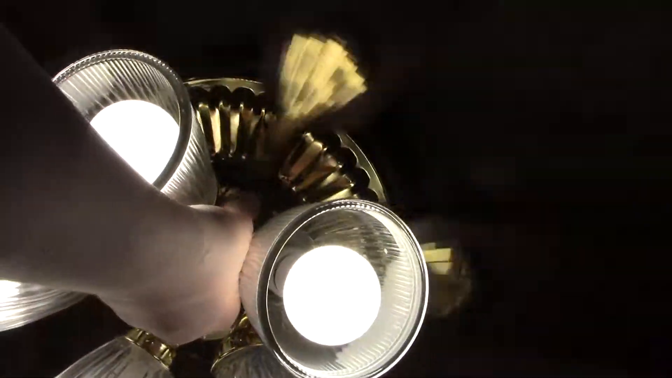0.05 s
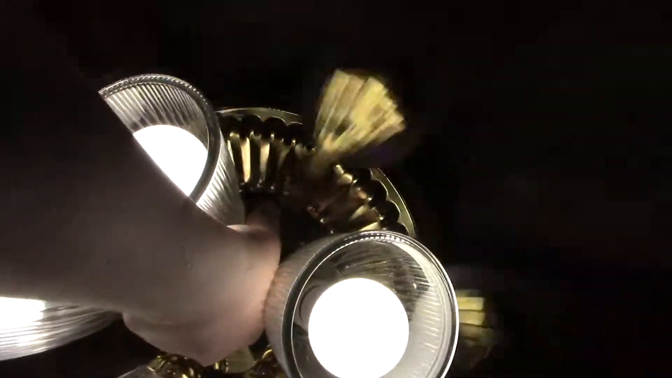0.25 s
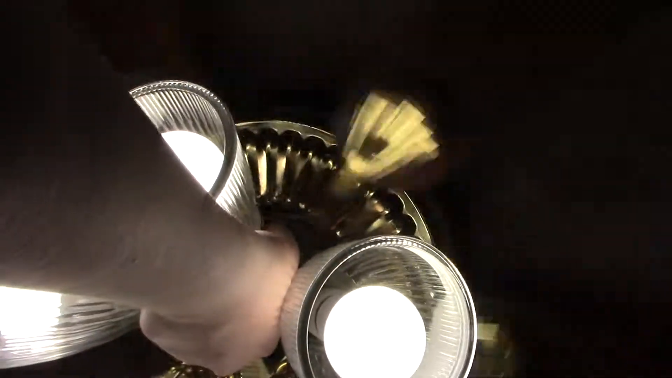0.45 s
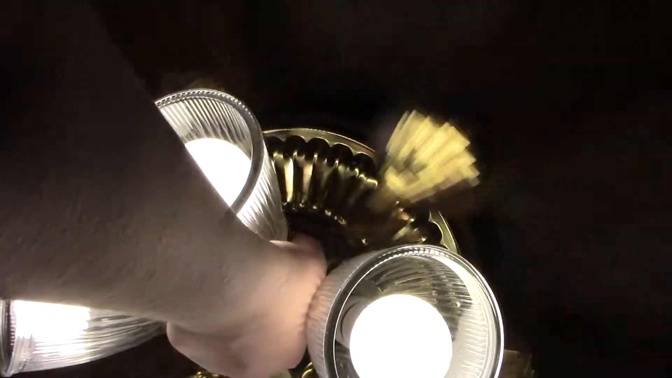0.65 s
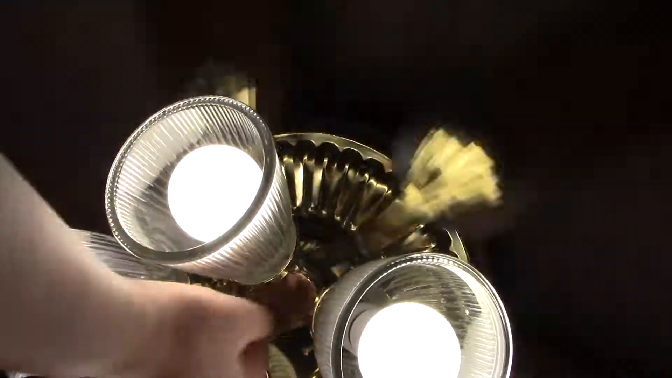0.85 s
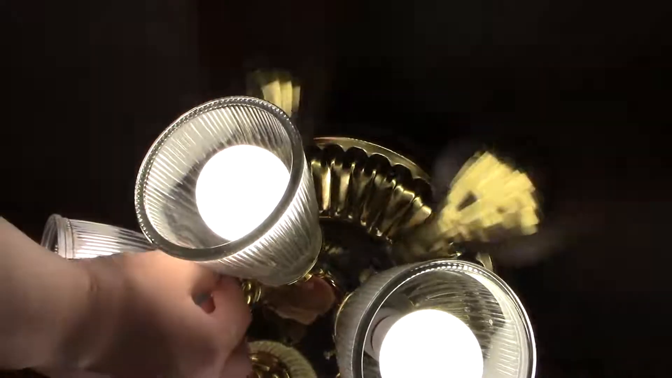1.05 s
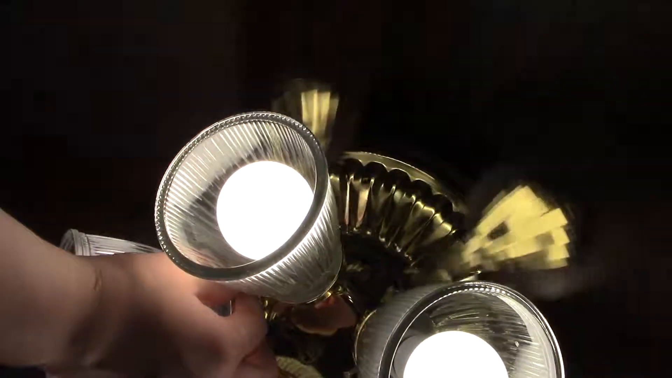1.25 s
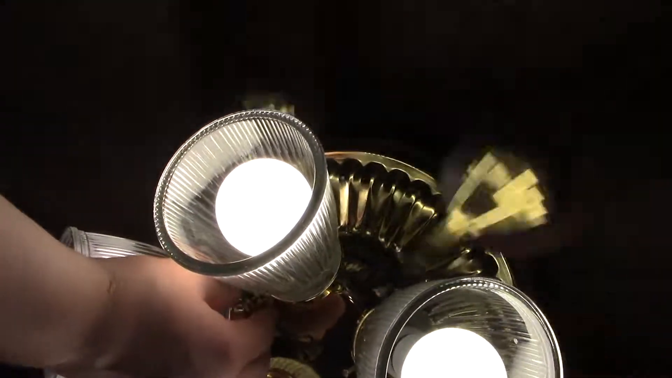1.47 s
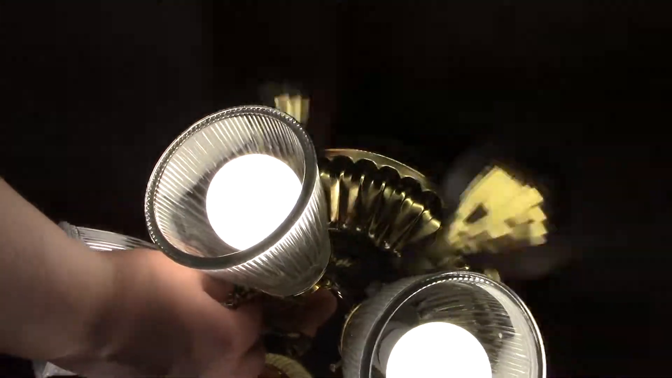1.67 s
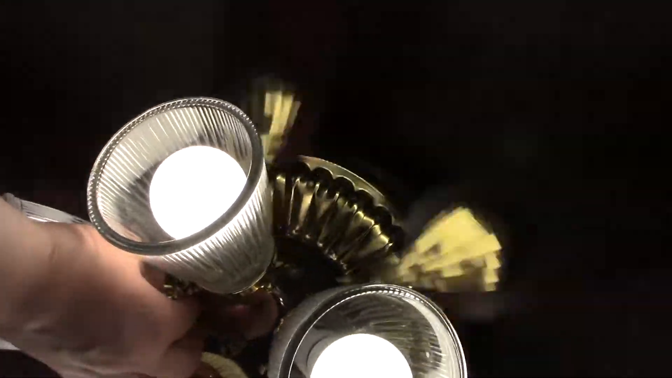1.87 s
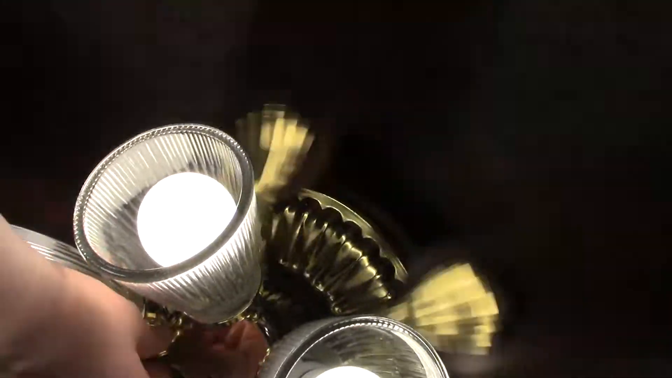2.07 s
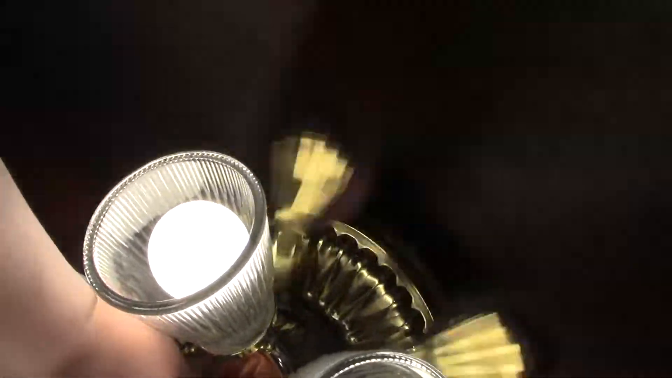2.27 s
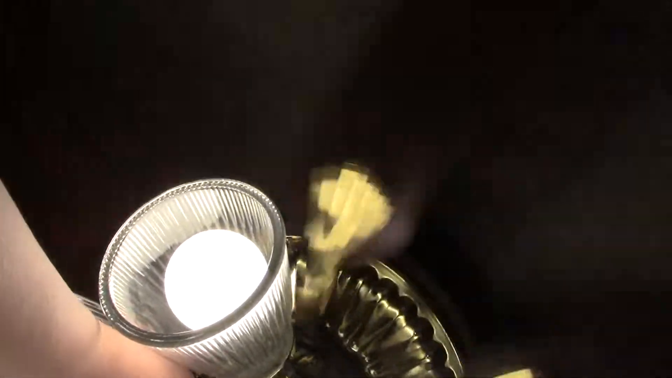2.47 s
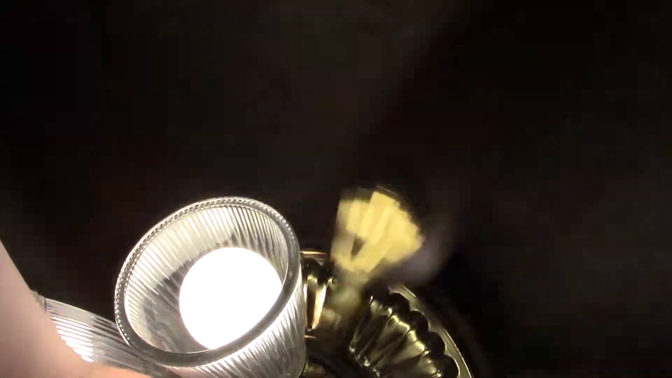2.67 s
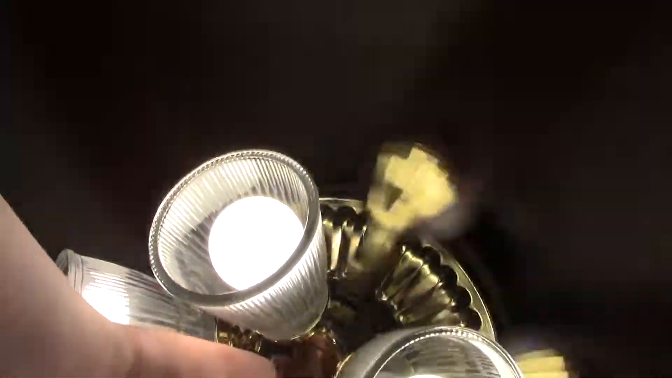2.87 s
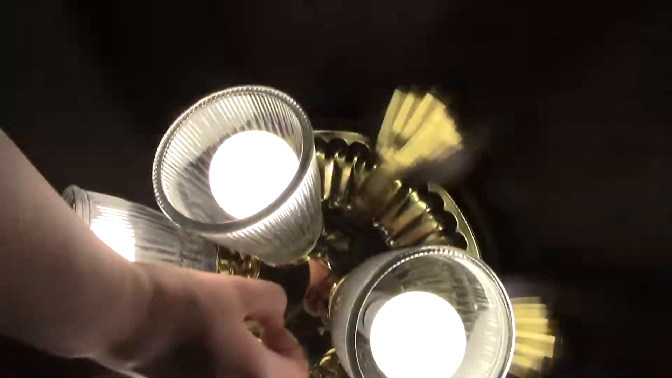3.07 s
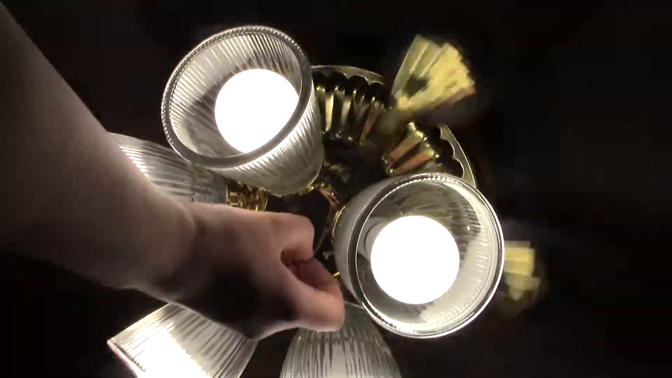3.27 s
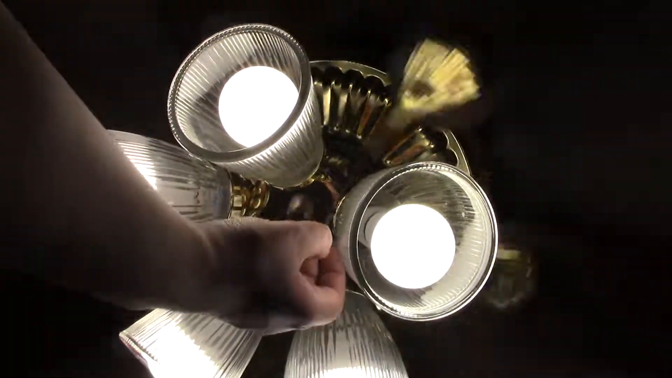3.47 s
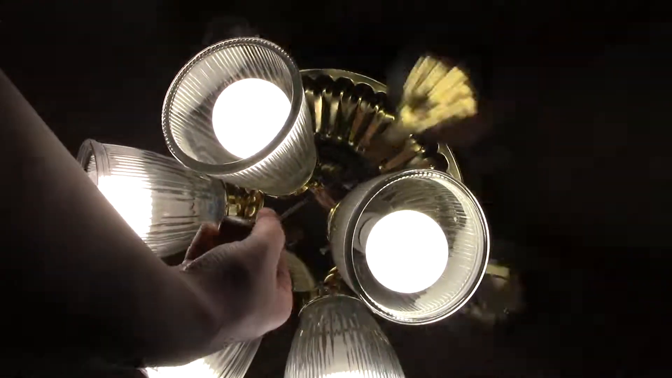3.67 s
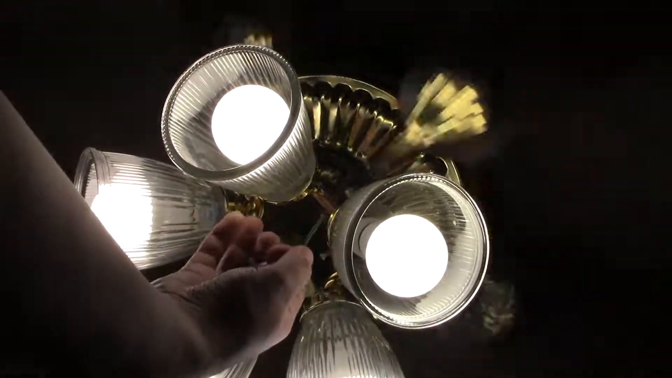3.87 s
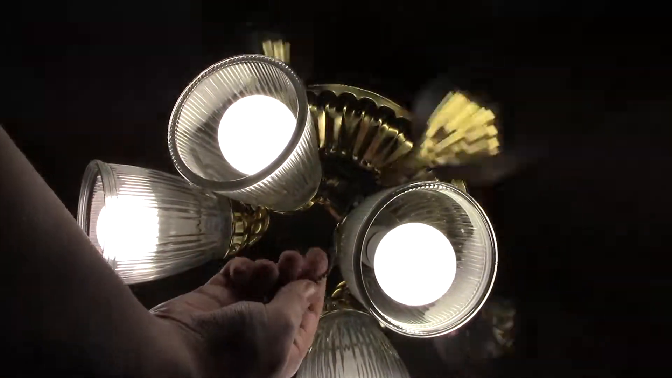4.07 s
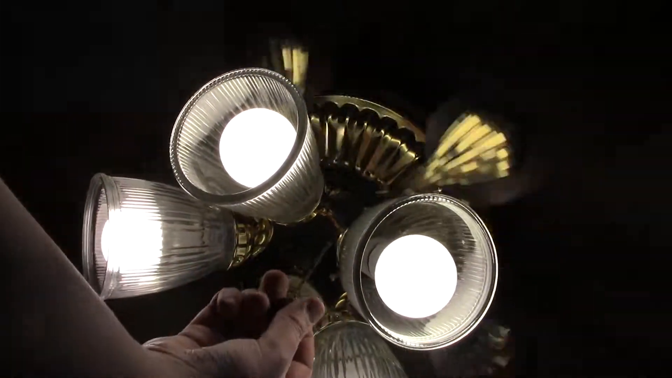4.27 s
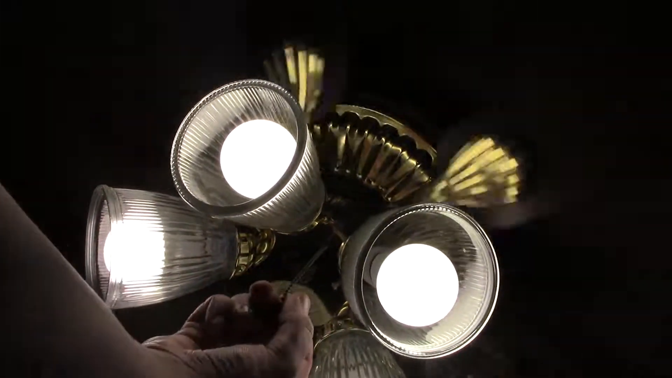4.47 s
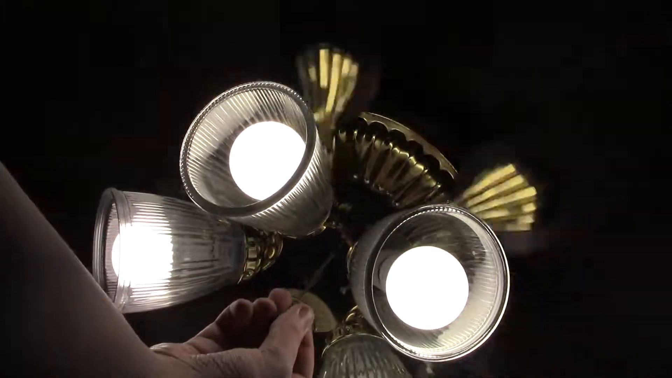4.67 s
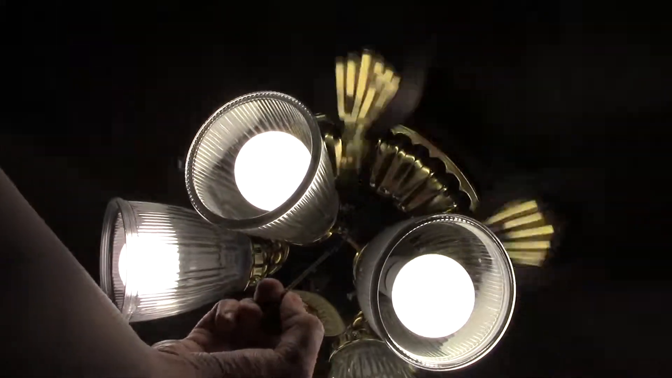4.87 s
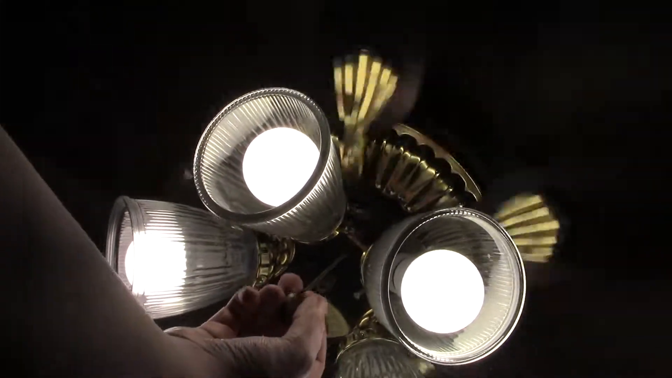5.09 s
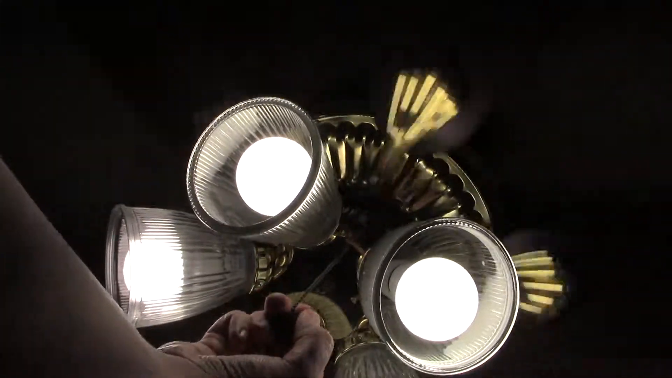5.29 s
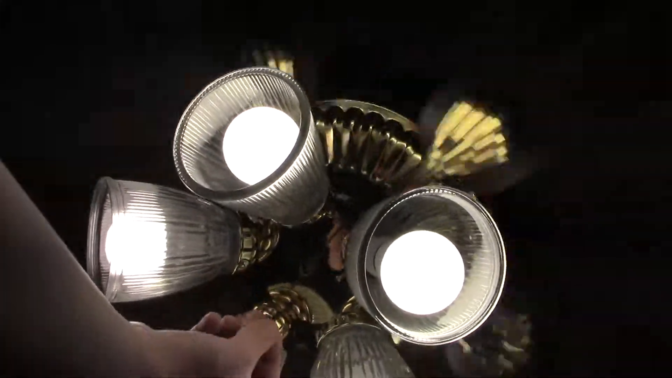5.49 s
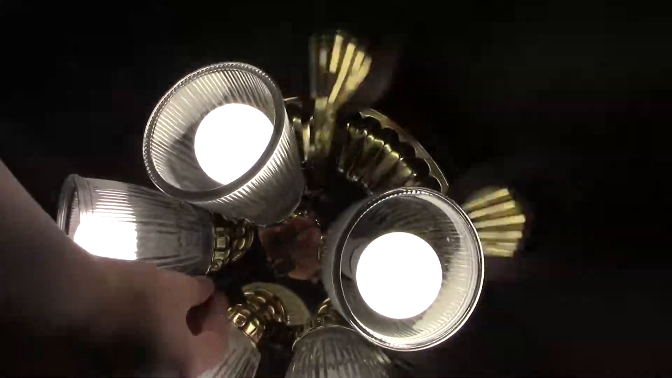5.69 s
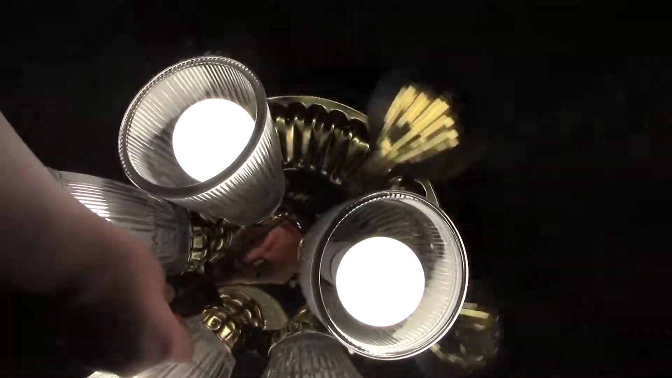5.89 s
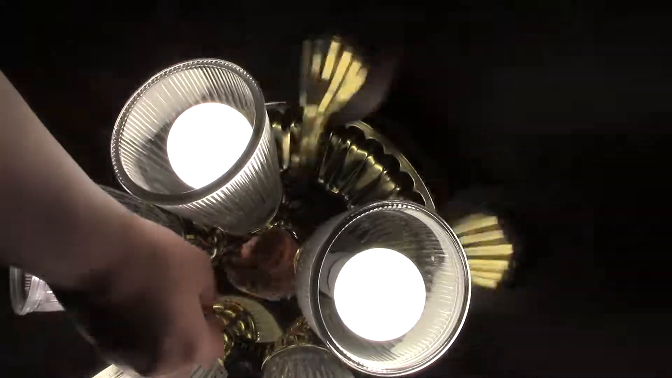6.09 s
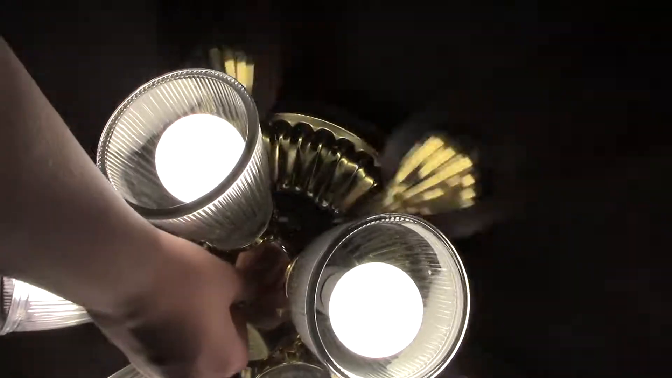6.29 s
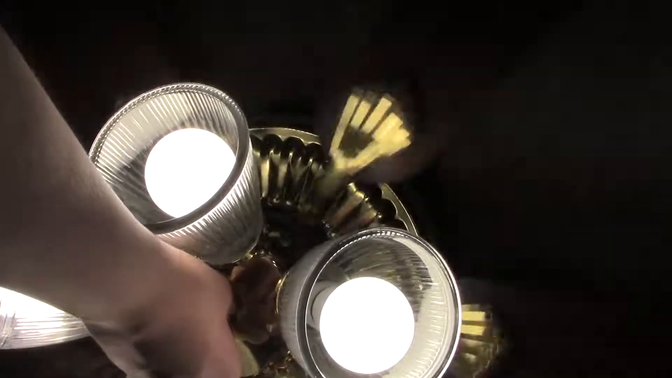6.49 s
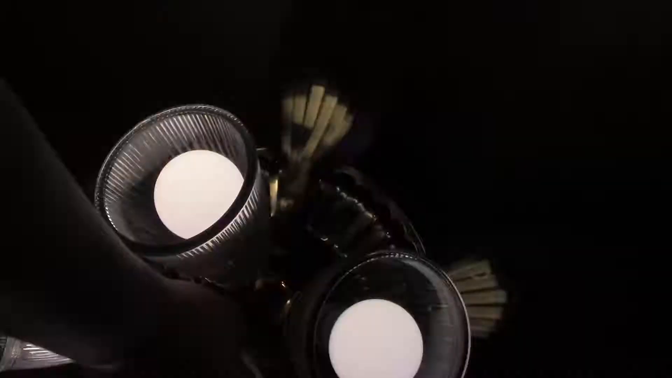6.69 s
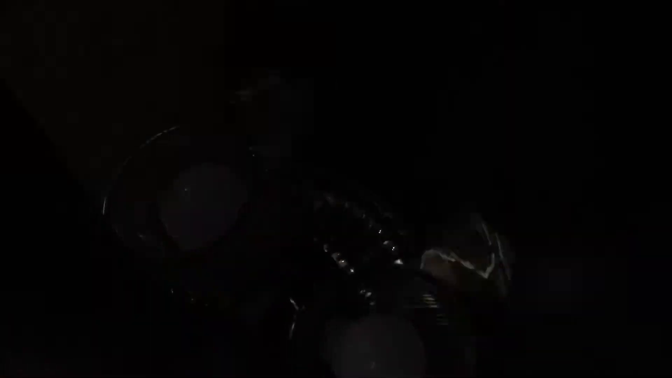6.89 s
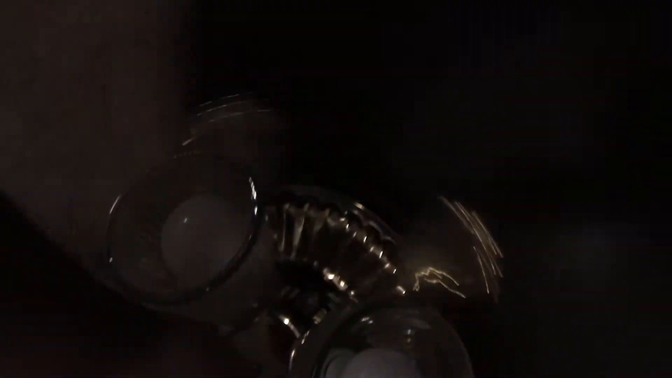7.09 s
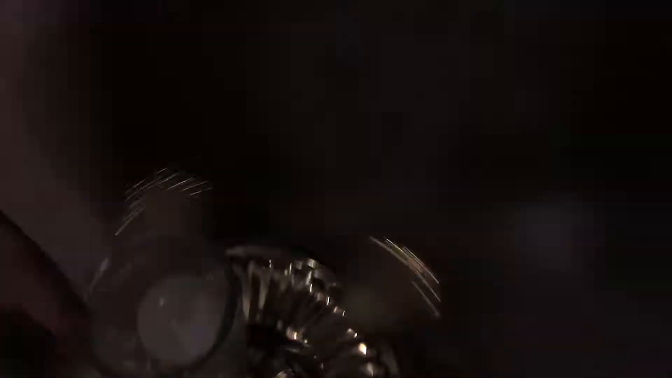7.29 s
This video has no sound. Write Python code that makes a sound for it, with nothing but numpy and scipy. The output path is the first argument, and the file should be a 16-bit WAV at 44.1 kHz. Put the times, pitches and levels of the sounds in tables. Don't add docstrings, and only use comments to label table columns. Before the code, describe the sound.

A ceiling fan turns throughout with a low, airy whir and faint motor hum, slightly stronger from about 2 to 5.5 seconds, then softening. The handling is very close, in a small room with short faint echo. From 0 to 2.4 s there are only quiet chain drags, finger taps, a soft creak near 0.8 s and glass or housing ticks around 1.5 s. Loud, hard knocks on thin brass burst out at 2.65 and 2.71, then 2.86 and 3.07, ringing briefly. Light glass ticks follow, with a bright one at 4.25. From 4.3 to 5.4 six quick chain pulls ratchet and snap with tiny spring pings. At 5.95 to 6.15 beads jingle and rub noisily on glass and brass. After light taps, the lamp switch snaps sharply at 6.74, clunks hollowly on release at 6.92, and the chain rustles away until about 7.4.

```python
import sys
import numpy as np
from scipy import signal
from scipy.fft import rfft, irfft, next_fast_len
from scipy.io import wavfile
from scipy.ndimage import uniform_filter1d, map_coordinates

SR = 44100
rng = np.random.default_rng(int(sys.argv[2]) if len(sys.argv) > 2 else 0)


def dump(signal):
    limited = np.clip(np.atleast_2d(signal).T, -1, 1)
    pcm = np.round(limited * 32767).astype(np.int16)
    wavfile.write(sys.argv[1], SR, pcm)


def ratio_of_db(decibels):
    return 10 ** (np.asarray(decibels, float) / 20)


N = 323694

# from_hz, to_hz
BANDS = [(500, 2000), (2000, 6500), (6500, 14000)]
# pitch_hz, level_db, t60_s
SHADE_MODES = [(2515, -7.5, 0.036), (4220, -7, 0.065), (4830, -21.5, 0.033), (5400, -3.5, 0.062),
               (6050, -8, 0.065), (7100, -0.5, .03), (8810, -1.5, 0.048), (9200, -11, 0.043),
               (11100, -17.5, 0.027), (11430, -3, .055), (12000, -8.5, .055), (13300, -5.5, .05),
               (14200, -3.5, .045), (15500, -9.5, .04)]
# start_s, mid_peak_db, low_db, high_db (both against mid), pitch_hz
CUP_KNOCKS = [
    (2.57, -24.5, 1.5, -23.5, 1310),
    (2.598, -30, 8, -9.5, 2140),
    (2.6461, -3.5, 1.5, -32, 2305),
    (2.6607, -17, 3.5, -39.5, 2090),
    (2.6729, -14, -0.5, -7.5, 2315),
]
RIM_KNOCKS = [
    (2.861, -6.5, 3.4, 0.5, 1715),
    (2.968, -18.5, 4.5, -15.5, 655),
]
ARM_KNOCKS = [
    (2.5585, -27.5, -9.5, 5.5, 5180),
    (2.713, -4.5, 0, -9.5, 4200),
    (2.785, -16.5, 7, -18, 1280),
]
BELL_KNOCKS = [
    (3.0673, -8.5, 0.72, -12, 2500),
]
# start_s, mid_peak_db, spring_db, rebound_db
PULLS = [
    (4.376, -19, 4.5, -13),
    (4.5831, -18.5, 4, -16),
    (4.813, -19.5, 12, -9),
    (4.9718, -14, 7, -12),
    (5.2121, -17, 6.5, -5.5),
    (5.3983, -15.5, -2, -15),
]
HARD_RISE_S = 0.0006


def unit(x):
    return x / np.sqrt(np.mean(x ** 2) + 1e-20)


def along(points, hz):
    f, v = np.transpose(points)
    return np.interp(np.log(hz + 1), np.log(f + 1), v)


def curves(rows):
    s, *cols = np.transpose(rows)
    return [np.interp(np.arange(N) / SR, s, c) for c in cols]


def wobble(rate):
    knots = rng.standard_normal(int(N * rate / SR) + 4)
    return map_coordinates(knots, [np.arange(N) * rate / SR])


def filtered(x, response):
    m = next_fast_len(N + SR // 2)
    return irfft(rfft(x, m) * response(np.fft.rfftfreq(m, 1 / SR)), m)[..., :N]


def resonances(peaks):
    def response(f):
        total = 0
        for k, (centre, width, db) in enumerate(peaks):
            peak = 1j * f * width / (centre * centre - f * f + 1j * f * width)
            total = total + (-1) ** k * ratio_of_db(db) * peak
        return total
    return response


def spikes(seconds, gains):
    return np.bincount(np.round(seconds * SR).astype(int), gains, N)[:N]


def fading(x, t60):
    return signal.lfilter([1], [1, -ratio_of_db(-60 / (t60 * SR))], x)


def struck(chatter, events, modes, ring_db, crack_t60s, body_db, body_t60s, scatter_db, detune, rise=0.0063):
    s, mid_db, low_db, high_db = np.transpose(events)[:4]
    colour_db = np.array([mid_db + low_db, mid_db, mid_db + high_db])
    out, rattle = np.zeros(N + SR), np.zeros(N)
    for edges, db, crack, body in zip(BANDS, colour_db, crack_t60s, body_t60s):
        band_pass = signal.butter(2, edges, "bandpass", fs=SR, output="sos")
        noise = unit(signal.sosfilt(band_pass, rng.standard_normal(N)))
        blows = spikes(s, ratio_of_db(db - 10.5))
        out[:N] += noise * (fading(blows, crack) - fading(blows, rise))
        rattle += noise * ratio_of_db(body_db) * chatter * fading(blows, body)
    walls = resonances([(hz, 0.1 * hz, 0) for hz, _, _ in modes])
    out[:N] += filtered(rattle, lambda f: 0.65 + 0.65 * abs(walls(f)))

    hz, level_db, t60 = np.transpose(modes)[:, :, None]
    band = np.searchsorted([BANDS[0][1], BANDS[1][1]], hz)
    t = np.arange(int(min(t60.max(), 1) * SR)) / SR
    onset = 1 - np.exp(-t / rise * 3.3)
    chance = rng.standard_normal((len(s), 3, len(modes), 1))
    for start, db, (luck, shift, split) in zip(s, (colour_db + ring_db).T, chance):
        turn = 2 * np.pi * hz * t * (1 + detune * shift)
        pair = (np.sin(turn) + 1.57 * np.sin(turn * (1 + 0.011 * split))) * onset
        decay_db = db[band] + level_db + scatter_db * luck - 60 * t / t60
        out[round(start * SR):][:len(t)] += np.sum(ratio_of_db(decay_db) * pair, 0)
    return out[:N]


def clacks(events, level_db, muffle=1):
    out, t = np.zeros(N + SR), np.arange(SR // 10) / SR
    damping = 60 / 0.9
    onset = 1 - np.exp(-t / 0.00016)
    for s, mid_db, low_db, high_db, hz in events:
        db = mid_db
        if hz < BANDS[0][1]:
            db = mid_db + low_db
        elif hz > BANDS[1][1]:
            db = mid_db + high_db
        decay = ratio_of_db(db + level_db - muffle * damping * t * hz ** 0.5)
        out[round(s * SR):][:len(t)] += decay * np.sin(2 * np.pi * hz * t) * onset
    return out[:N]


def rubbing(strokes, response, rate, spiky_db):
    slips = rng.random(N) < rate / SR
    grains = rng.standard_normal(N) * slips * ratio_of_db(spiky_db * rng.standard_normal(N))
    t, level = np.arange(N) / SR, np.zeros(N)
    for start, top, end, db in strokes:
        swell_db = np.interp(t, [start, top, end], [-11.5, 0, -38])
        edges = np.clip(np.minimum(t - start, end - t) / 0.015, 0, 1)
        level += ratio_of_db(db + swell_db) * edges
    return level * unit(filtered(grains, response))


def rush(spectrum, patchy_db):
    # pitch_hz, side_minus_mid_db
    side_balance = [(60, -9), (200, -32.5), (380, -26), (1290, -16), (2380, -12), (8120, -11.5),
                    (15000, -15.5)]
    z = signal.stft(rng.standard_normal((2, N)), nperseg=512)[2]
    field = uniform_filter1d(rng.standard_normal(z.shape[1:]), size=6, axis=0)
    field = uniform_filter1d(field, size=14, axis=1)
    pair = signal.istft(z * ratio_of_db(patchy_db * unit(field)), nperseg=512)[1][:, :N]
    mid, side = filtered(pair, lambda hz: ratio_of_db(along(spectrum, hz)) * [hz * 0 + 1, ratio_of_db(along(side_balance, hz))])
    return unit(np.array([mid + side, mid - side]))


def fan():
    # start_s, level_db
    draught = [
        (0, -49),
        (2.08, -46),
        (2.6, -43.5),
        (3.76, -44),
        (4.95, -43),
        (5.74, -48.5),
        (6.3, -51),
        (7.34, -52.5),
    ]
    # pitch_hz, level_db_per_hz
    rumble_spectrum = [(20, -43), (59, -18.5), (125, -5), (209, -5.5), (300, -4.5), (390, -34.5),
                       (660, -120)]
    air_spectrum = [(71, -36.5), (120, -11.5), (216, 5), (400, 3.5), (654, -1), (999, -24), (2000, -39),
                    (4400, -120)]
    hiss_spectrum = [(410, -43.5), (700, -6), (1140, -11.5), (1740, -15), (3040, -22.5), (8750, -33.5),
                     (15000, -43.5), (16500, -56.5)]
    # pitch_hz, level_db (rms)
    windings = [(360.7, -61)]
    air_db, = curves(draught)
    swish = wobble(2.89)
    t = np.arange(N) / SR
    rumble_db = air_db - 14 + 1 * t
    hiss_db = -54 + 0.42 * (air_db - air_db.mean())
    hum = np.zeros(N)
    for hz, db in windings:
        level = np.sqrt(2) * ratio_of_db(db + 2.5 * wobble(6))
        hum += level * np.sin(2 * np.pi * hz * t + 0.6 * wobble(8))
    rumble = ratio_of_db(rumble_db + 0.88 * wobble(9.3)) * rush(rumble_spectrum, patchy_db=0.2)
    air = ratio_of_db(air_db + 0.4 * swish + 0.5 * wobble(11)) * rush(air_spectrum, patchy_db=1.2)
    hiss = ratio_of_db(hiss_db + 1.1 * swish) * rush(hiss_spectrum, patchy_db=1.2)
    return rumble + air + hiss + hum


def slide():
    # start_s, hardest_s, end_s, level_db
    chain_strokes = [
        (0, .14, 0.7, -52),
        (.7, .86, 1.12, -53.5),
        (2.54, 2.62, 2.67, -45),
        (5.94, 6.0, 6.1, -36),
        (6.89, 6.91, 7.38, -42),
    ]
    finger_strokes = [
        (1.39, 1.426, 1.7, -57),
        (5.98, 6.08, 6.22, -30),
        (6.38, 6.49, 6.62, -49),
    ]
    scrape_strokes = [
        (1.395, 1.425, 1.445, -49),
        (1.78, 1.81, 1.84, -52),
    ]
    rocking_strokes = [
        (6.70, 6.765, 6.85, -26),
        (6.89, 6.93, 7.02, -22.5),
    ]
    # pitch_hz, width_hz, level_db
    brass = [(850, 130, 8), (1280, 170, 8), (2230, 150, -0.5), (4170, 1500, -23)]
    scraped_glass = [(2150, 180, 5), (4250, 190, 2), (4940, 300, -3), (5600, 300, -7), (7200, 500, -13)]
    hollow_cup = [(642, 90, 2.5), (840, 150, -1), (1160, 220, -6.5)]
    glass = resonances([(hz, 9 / t60, db) for hz, db, t60 in SHADE_MODES])

    def ribs(f):
        bare_beads = ratio_of_db(-14.0) * 1j * f / (2500 + 1j * f)
        return (glass(f) + bare_beads) / (1 + (f / 6500) ** 5)

    chain = rubbing(chain_strokes, ribs, 2200, spiky_db=-2.0)
    fingers = rubbing(finger_strokes, resonances(brass), 2500, spiky_db=3.5)
    scrape = rubbing(scrape_strokes, resonances(scraped_glass), 5000, spiky_db=0.6)
    rocking = rubbing(rocking_strokes, resonances(hollow_cup), 750, spiky_db=-4.0)
    return chain + fingers + scrape + rocking


def finger_taps(chatter):
    # start_s, mid_peak_db, low_db (against mid)
    bumps = [(0.377, -50.5, 8.5), (0.439, -52, 8), (0.4745, -40.5, -11), (0.53, -51, 8.5),
             (0.8, -41.5, -5.5), (0.842, -44, -1), (1.2788, -42, -19), (1.5214, -35, 2.5), (1.652, -47, 1),
             (2.003, -37.5, -7.5), (2.3048, -40.5, -6.5), (3.008, -40, -15.5), (3.018, -45, -22),
             (3.362, -40, 0), (3.804, -45, -8), (6.301, -60, 18.5), (6.4953, -47.5, 9.5),
             (7.068, -40.5, -4), (7.1952, -51.5, -10.5)]
    # start_s, mid_peak_db, high_db (against mid), pitch_hz
    flicks = [(0.0405, -51, -28, 2430), (1.0598, -40.5, 1.5, 8330), (1.455, -38, 1, 7360),
              (1.6247, -34.5, 1.5, 7300), (1.744, -39.5, -31, 2730), (1.786, -57, 1.5, 7200),
              (1.801, -42, 3.5, 7200), (1.811, -38.5, -5, 5800), (1.966, -44.5, 7.5, 7370),
              (2.257, -40.5, 7, 6000), (3.3512, -39.5, 4.5, 5540), (3.7738, -39, -1.5, 6950),
              (4.155, -38.5, -1, 8500), (5.5391, -38, -1.5, 5860), (5.649, -49, 4, 2710),
              (6.3815, -46.5, -26, 2150), (6.6118, -39, -2.5, 2910), (6.6275, -37.5, 0.5, 2050),
              (7.3272, -40, -19, 2670)]
    held = [(hz, db, 0.45 * t60) for hz, db, t60 in SHADE_MODES]
    soft = [(s, db, low, -6.5, 1290) for s, db, low in bumps]
    soft += [(s, db, 0, high, hz) for s, db, high, hz in flicks]
    body = struck(chatter, soft, held, -13.5, (0.011, 0.011, 0.009), 0.0, (0.06, 0.05, 0.04), 3.5, 0.0052)
    return body + clacks(soft, 4.5)


def chain_on_glass(chatter):
    # start_s, mid_peak_db, low_db, high_db (both against mid)
    ticks = [(0.152, -39.5, 2, -8), (0.2034, -47.5, -7, 1), (0.755, -45, 10, -0.5),
             (2.4348, -36.5, 3, -5.5), (3.215, -46, 5, 2), (3.4175, -33, 9, -6), (3.4312, -33.5, -2, 2),
             (3.494, -44.5, 8, -12), (3.9602, -29.5, 0, 0.5), (4.004, -39, 1, 3), (4.0257, -35, -21, 1.5),
             (4.0925, -32, -14, 0), (4.0968, -42, -13, 3.5), (4.125, -49, -16, 4.5),
             (4.168, -37.5, -14.5, 5.5), (4.1997, -44, -3.5, -3), (4.251, -24.5, -24.5, 7),
             (5.035, -37, 1, -0.5), (5.093, -47, -8, 4), (5.128, -51, -7, -1.5), (5.46, -36, -13, -13.5),
             (5.4837, -41.5, -16.5, -2), (5.62, -52, 1.5, 1), (5.656, -42, -11, 0), (5.694, -34, -1.5, -11),
             (6.25, -55, 16, -16.5), (6.439, -47, 10, -5.5), (6.4558, -48, -3, 0.5)]
    jingle = [(5.9476, -36.5, -6, 7), (5.9521, -17.5, -1, 5), (5.9587, -24.5, -4, -2),
              (5.97, -26, -21.5, -2), (5.9807, -24.5, -5, -2), (5.9907, -24, -14.5, 9),
              (5.9952, -22.5, -15, 5.5), (5.9967, -29, -11, 0), (6.007, -28.5, -17.5, 13),
              (6.054, -16, -2, 2), (6.147, -45, 5, 0), (6.952, -38, -3, -4.5), (6.0025, -22.5, -24.5, 6.5),
              (6.0494, -16, -4.5, 0.5), (6.8975, -21, -3, 2.5), (6.946, -40.5, 7, -11.5),
              (6.964, -35.5, -10, -7.5), (6.974, -28, 1, -3.5), (6.9877, -23, -13, -9),
              (6.9966, -32, -1, -3)]
    # pitch_hz, level_db, t60_s
    near_modes = [(1250, 3, 0.047), (2620, -3, .05), (5540, -10, 0.059), (7180, -3.5, 0.035),
                  (8660, -4.5, 0.05), (9200, -5, 0.056), (10760, -7, 0.036), (11200, -9.5, 0.042),
                  (12300, -4.5, 0.076), (13350, -4.5, 0.071), (14100, -9, 0.044), (4250, -6, .05)]
    # pitch_hz, width_hz, depth (0-1)
    dip_hz, width_hz, depth = (3300, 1300, .7)
    knocks = CUP_KNOCKS + RIM_KNOCKS + ARM_KNOCKS + BELL_KNOCKS
    shaken = [(s, db - 28, 0, high + 16.5) for s, db, _, high, _ in knocks]
    far = struck(chatter, ticks + shaken, SHADE_MODES, -12.0, (0.012, 0.014, 0.012),
                 -0.5, (0.06, 0.06, 0.05), 3.2, 0.005, HARD_RISE_S)
    near = struck(chatter, jingle, near_modes, -13, (0.012, 0.012, 0.01),
                  -3.5, (0.06, 0.05, 0.04), 2.3, 0.0028, 0.0015)
    dip = resonances([(dip_hz, width_hz, 0)])
    return filtered(far + near, lambda f: 1 - depth * dip(f))


def creak():
    # start_s, peak_db
    slips = [(0.812, -34), (0.8245, -35), (0.8391, -31.5), (0.799, -41), (0.868, -36), (6.726, -51),
             (6.742, -27), (6.92, -35.5)]
    # pitch_hz, width_hz, level_db
    shell_peaks = [(336, 33, 11.5), (840, 260, -1.5), (1880, 1400, -13.5)]
    s, db = np.transpose(slips)
    shell = resonances(shell_peaks)
    return filtered(spikes(s, ratio_of_db(db + 36.0)), lambda hz: shell(hz) / (1 + 1j * hz / 1600) ** 2)


def hollow_notes():
    # start_s, peak_db, pitch_hz
    spots = [(1.424, -35, 1500), (1.454, -39, 4400), (1.454, -38, 5900), (1.5276, -40.5, 2200),
             (1.625, -36.5, 4340), (1.637, -43, 4250), (2.8606, -16, 1320), (2.8603, -8, 1850),
             (2.8603, -11, 2350), (3.0678, -10, 2500), (2.784, -20, 2800), (2.9683, -11, 740),
             (2.9695, -15, 1396), (2.989, -27.5, 700), (3.0692, -16, 1780), (3.076, -18, 1250),
             (3.093, -23.5, 1420), (3.124, -28, 1450), (4.252, -14, 8530), (4.2516, -16, 12020),
             (4.2516, -22.5, 11150), (4.251, -23, 6050), (4.003, -33, 5400), (4.152, -35.5, 5660),
             (4.974, -16.5, 1200), (4.974, -14.5, 5170), (6.697, -28, 793), (6.7445, -11, 1170),
             (6.899, -32, 5540), (6.9197, -14, 790), (6.9197, -25, 643)]
    return clacks([(s, db, 0, 0, hz) for s, db, hz in spots], 0)


def lamp_switch(chatter):
    # start_s, mid_peak_db, low_db, high_db (both against mid), pitch_hz
    contacts = [(1.508, -55, -10, 6, 8200), (1.5276, -25, -1.5, -7.5, 1240), (4.227, -37.5, 2.5, 0.5, 1320),
                (5.881, -28.5, -4.5, -3.5, 1120), (6.0287, -11.5, -5, -7.5, 2630),
                (6.0352, -18, 3.5, -6, 1280), (6.0664, -25, 0, -9.5, 1050), (6.073, -19.5, 3, -14.5, 1290),
                (6.134, -25, 0, -19.5, 1080), (6.1379, -27.5, 8.5, -26, 1230),
                (6.704, -41.5, 10.5, -21, 624), (6.724, -32.5, 4.5, -7, 668), (6.743, -17, 4.5, 10, 8080),
                (6.878, -37.5, 11.5, -2.5, 610), (6.9198, -13.5, -6, -11.5, 1060),
                (6.9202, -25.5, 8.5, 3, 8570), (6.726, -44, 0, -15, 472)]
    # pitch_hz, level_db, t60_s
    housing = [(620, -19, 0.036), (845, -4.5, 0.046), (1080, 0.5, 0.043), (1290, -3.5, 0.063),
               (1696, -15.5, 0.068), (2620, -4, 0.039), (4200, -10.5, .02), (5300, -18.5, .04),
               (6570, -16, 0.025), (6960, -3.5, 0.039), (7700, -5, 0.045), (8670, -8.5, 0.03)]
    body = struck(chatter, contacts, housing, -13.5, (0.02, 0.015, 0.008),
                  -5.5, (0.12, 0.1, 0.055), 3.5, 0.018, 0.0041)
    return body + clacks(contacts, -0.31)


def knob_on_brass(chatter):
    # pitch_hz, level_db, t60_s
    cup_modes = [(972, -11, 0.039), (1330, -15.5, 0.083), (760, -19.5, 0.056), (1977, -21, 0.06),
                 (2212, -3, 0.066), (2242, -14.5, 0.14), (2490, -5, 0.063), (5460, -16.5, 0.11),
                 (5700, -20.5, 0.089)]
    rim_modes = [(990, -8, .03), (1250, -9, 0.03), (1340, -2.5, 0.047), (1880, 0.5, 0.025),
                 (2065, -1.5, 0.033), (2500, -3, 0.018), (3080, -15.5, 0.045), (4200, -9.5, 0.061),
                 (5000, -12.5, 0.054), (5660, -11.5, 0.045)]
    arm_modes = [(1292, -10, .03), (2680, -5, .03), (2960, -9, .03), (4184, 0, .045), (4770, -15.5, .07),
                 (5459, -1, .03), (6540, -7, .03), (7747, -11, .04), (8760, -19, .06), (11360, -18, .05)]
    bell_modes = [(2150, -10, 0.06), (2498, -8, 0.037), (2720, -13, .03), (4254, -10, 0.05),
                  (4740, -10, 0.05), (5130, -6, .06), (5450, -12, .07), (7200, -11, 0.043),
                  (9050, -15, .15), (11200, -18, 0.042)]
    cup = struck(chatter, CUP_KNOCKS, cup_modes, -12.0, (0.01, 0.009, 0.007),
                 -9.5, (0.12, 0.12, 0.08), 0.93, 0.0032, HARD_RISE_S)
    rim = struck(chatter, RIM_KNOCKS, rim_modes, -16.5, (0.01, 0.009, 0.007),
                 -10.5, (0.12, 0.12, 0.08), 0.56, 0.0022, HARD_RISE_S)
    arm = struck(chatter, ARM_KNOCKS, arm_modes, -12.0, (0.016, 0.013, 0.011),
                 -7.0, (0.12, 0.12, 0.08), 1, 0.0027, HARD_RISE_S)
    bell = struck(chatter, BELL_KNOCKS, bell_modes, -10.5, (0.014, 0.014, 0.009),
                  -17.0, (0.12, 0.15, 0.08), 0.93, 0.0016, HARD_RISE_S)
    knob = clacks(CUP_KNOCKS + RIM_KNOCKS + ARM_KNOCKS + BELL_KNOCKS, -6.0)
    return cup + rim + arm + bell + knob


def after_rings():
    # start_s, level_db, pitch_hz, t60_s
    rings = [(2.6451, -23, 1658, 0.29), (2.713, -34, 1290, 0.16), (2.713, -26.5, 946, 0.14),
             (2.8601, -42, 1701, 0.8), (3.0672, -41, 1701, 0.97), (3.0672, -40, 1427, .5),
             (4.0267, -48, 2550, .06), (4.251, -36, 2524, 0.06), (4.251, -38, 5300, .1),
             (4.251, -47, 5240, .1), (6.0497, -36.5, 837, 0.9), (6.7442, -30, 845, 0.3),
             (6.744, -47, 1696, 0.46), (6.9191, -38, 824, 0.4), (4.003, -37, 8900, .12),
             (4.251, -40, 6030, .1), (5.399, -38.5, 3950, .25), (5.414, -25.5, 1130, .12),
             (5.952, -27, 1320, .05), (5.985, -35, 2620, .07), (6.297, -41, 1330, .06),
             (6.414, -40, 850, .06), (6.434, -36, 1330, .08), (6.462, -38, 1330, .07),
             (6.459, -48.5, 2550, .05), (6.7438, -34, 1218, .25), (6.898, -29.5, 5540, .2),
             (6.9191, -28, 1090, .15), (4.63, -40, 1386, .12)]
    out, t = np.zeros(N + SR), np.arange(SR) / SR
    onset = 1 - np.exp(-t / 0.0023)
    for s, db, hz, t60 in rings:
        out[round(s * SR):][:SR] += ratio_of_db(db - 60 * t / t60) * np.sin(2 * np.pi * hz * t) * onset
    return out[:N]


def fan_switch(chatter):
    # start_s, mid_peak_db, high_db (against mid), pitch_hz
    beads = [(4.3257, -32, 3, 1360), (4.351, -26.5, -24, 1370), (4.3698, -24.5, -5.5, 840),
             (4.389, -28, -17, 900), (4.5154, -25.5, 2, 1110), (4.542, -26.5, -4.5, 1130),
             (4.569, -24.5, -15, 1110), (4.5807, -23.5, -2, 1170), (4.595, -28, -16.5, 1180),
             (4.7829, -27, 1.5, 2620), (4.7928, -26, -13, 2320), (4.8015, -30, -11.5, 1720),
             (4.8085, -19.5, -7, 810), (4.825, -28, -9, 1120), (4.936, -26, 0.5, 1250),
             (4.9553, -21, -17.5, 1110), (4.969, -24.5, -16, 1080), (5.162, -29.5, -4, 1250),
             (5.185, -27, -5, 2620), (5.196, -24, -16, 1340), (5.204, -26.5, -8.5, 750),
             (5.3507, -27.5, 2.5, 1270), (5.3769, -22.5, -12.5, 1110), (5.4077, -17.5, -9, 1100)]
    # pitch_hz, level_db, t60_s
    housing = [(640, -8, 0.057), (840, -4, 0.073), (1081, -4, 0.034), (1330, -4, 0.054), (1707, -10, 0.044),
               (2250, -7.5, 0.037), (2634, -11.5, 0.039), (3950, -7, 0.021), (5280, -9, 0.029),
               (6870, 5, 0.015), (7650, 0.5, 0.018), (9070, -4.5, .018), (10970, -15, .018)]
    steps = [(s, db, -1, high, hz) for s, db, high, hz in beads]
    snaps = [(s, db, -4.5, 1, 1090) for s, db, _, _ in PULLS]
    rebounds = [(s + 0.0066, db + loss, 3, -30.5, 1200) for s, db, _, loss in PULLS]
    contacts = steps + snaps + rebounds
    body = struck(chatter, contacts, housing, -12.5, (0.025, 0.018, 0.008),
                  -6.5, (0.12, 0.11, 0.1), 3.5, 0.026, 0.003)
    return body + clacks(contacts, -1.4)


def springs():
    # start_s, peak_db, pitch_hz
    lamp_s, lamp_db, lamp_hz = (6.7442, -3, 7800)
    pings = [(lamp_s, lamp_db, 0, 0, lamp_hz)]
    for s, db, spring_db, _ in PULLS:
        for hz in (8700, 10200):
            pings.append((s, db, 0, spring_db, hz * (1 + 0.075 * rng.standard_normal())))
    return clacks(pings, 5.5, muffle=2.1)


def fittings():
    chatter = unit(ratio_of_db(3.2 * wobble(600)))
    glass = finger_taps(chatter) + chain_on_glass(chatter)
    brass = knob_on_brass(chatter) + after_rings()
    switches = lamp_switch(chatter) + fan_switch(chatter) + springs()
    return glass + hollow_notes() + brass + switches


def room(x):
    # pitch_hz, t60_s
    decay = [(300, 0.3), (1500, 0.36), (5000, 0.31), (12000, 0.14)]
    out, step, gap = np.zeros((2, N + 2 * SR)), SR // 2, 130
    for start in range(0, N, step):
        hz, t, z = signal.stft(rng.standard_normal((2, step)), SR, nperseg=256)
        z = z * ratio_of_db(-60 * t / along(decay, hz)[:, None])
        mid, side = signal.istft(z, SR, nperseg=256)[1][:, :step]
        tail = np.array([mid + ratio_of_db(-18) * side, mid - ratio_of_db(-18) * side]) / np.linalg.norm(mid)
        wet = signal.fftconvolve(x[None, start:start + step], tail, axes=1)
        out[:, start + gap:start + gap + wet.shape[1]] += wet
    return out[:, :N]


def stirred(x):
    swing_s, changes_per_s = 6e-5, 45
    at = np.arange(N) + swing_s * SR * wobble(changes_per_s)
    return np.array([map_coordinates(side, [at]) for side in x])


def shadow(x):
    t = np.arange(SR // 50) / SR
    burst = rng.standard_normal(len(t)) * ratio_of_db(-60 * t / 0.004)
    side = ratio_of_db(-23) * signal.fftconvolve(x, burst / np.linalg.norm(burst))[:N]
    return np.array([side, -side])


def scene():
    kit = filtered(fittings() + slide(), lambda hz: (1j * hz / (1j * hz + 330)) ** 4 / (1 + (hz / 15500) ** 6))
    treble = filtered(kit, lambda hz: 1j * hz / (1j * hz + 1800))
    lean = ratio_of_db(-27.0) * (0.3 + wobble(8.1)) * treble
    wet = ratio_of_db(-11.5) * room(kit)
    return kit + [lean, -lean] + creak() + fan() + shadow(treble) + stirred(wet)


def top_cut(x):
    return signal.sosfilt(signal.butter(12, 16960, fs=SR, output="sos"), x)


def record(dry):
    rounded = dry / (1 + np.abs(dry / 0.95) ** 6) ** (1 / 6)
    banded = filtered(rounded, lambda hz: (hz < 16900) * 1j * hz / (1j * hz + 30))
    return top_cut(banded)


dry = scene()
out = record(dry)
dump(out)
```